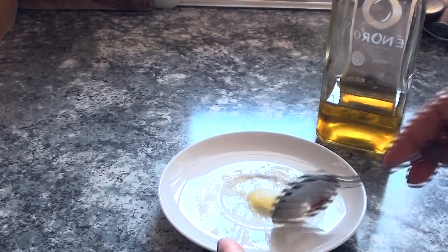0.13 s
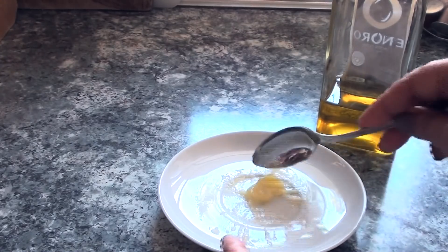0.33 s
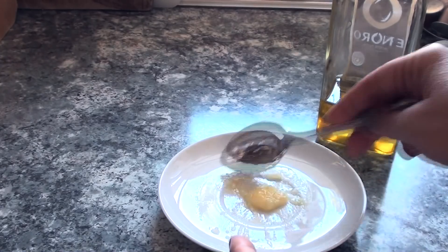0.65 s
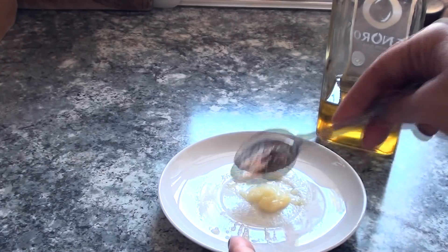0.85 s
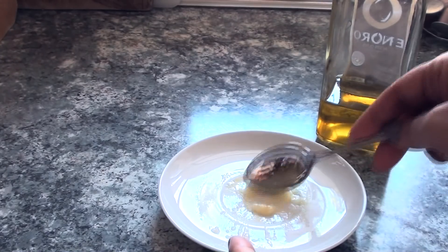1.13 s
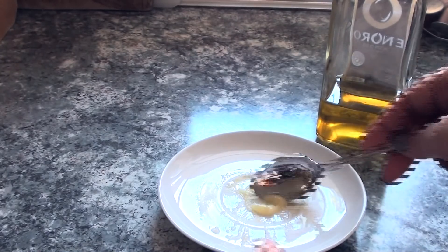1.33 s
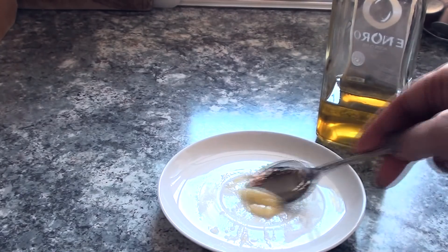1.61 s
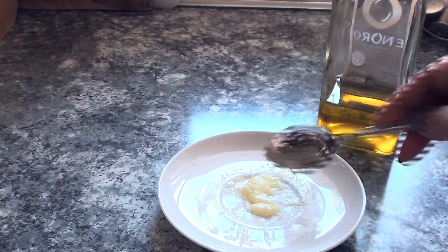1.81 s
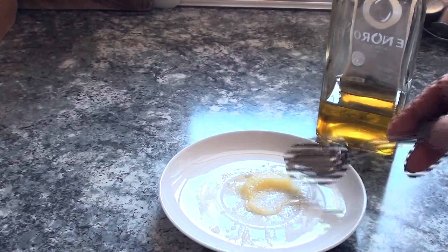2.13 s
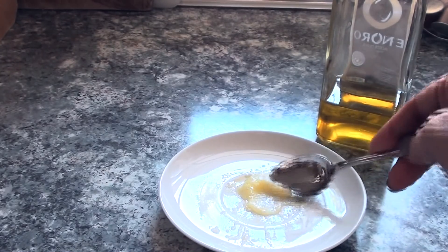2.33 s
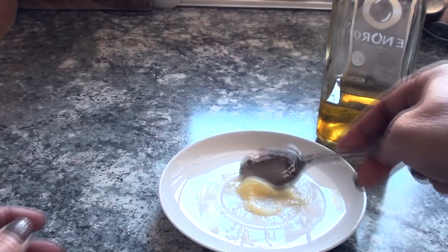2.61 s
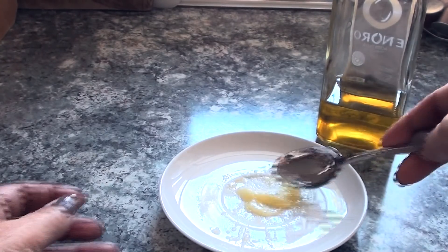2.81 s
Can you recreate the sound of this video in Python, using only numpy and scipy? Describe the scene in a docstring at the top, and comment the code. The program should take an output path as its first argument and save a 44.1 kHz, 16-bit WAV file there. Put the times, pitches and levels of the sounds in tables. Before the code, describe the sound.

Close stereo pickup of a spoon clinking and scraping a ceramic saucer on a stone counter; strokes grow lighter, nearly fade to wet smearing, then return brighter, over steady low hum and hiss with slight room echo.

```python
"""Spoon working paste on a saucer

A metal spoon works a paste round a small ceramic saucer on a stone counter, heard close to.
Strokes clink, chatter and scrape: impulses and grit noise drive damped saucer modes and thin spoon modes.
Faint short clinks of the spoon on the saucer are fast-decaying sines; lighter strokes only smear the
paste, as gliding bands of noise.
A hard kitchen echoes it by a decaying noise tail, over coloured noise as low appliance rumble and hiss."""
import sys
import numpy as np
from scipy import signal
from scipy.fft import rfft, irfft
from scipy.io import wavfile
from scipy.ndimage import uniform_filter1d

SR = 44100
rng = np.random.default_rng(int(sys.argv[2]) if len(sys.argv) > 2 else 0)


def invert_db(level):
    """Linear amplitude ratio for a level in decibels (20 dB per decade), elementwise."""
    return 10 ** (np.asarray(level, dtype=float) / 20)


def int16_out(signal):
    """Quantize to a 16-bit WAV file."""
    q = np.round(np.clip(np.atleast_2d(signal).T, -1, 1) * 32767)
    wavfile.write(sys.argv[1], SR, q.astype(np.int16))


N = 130095
TIME_S = np.arange(N) / SR


def unit(x):
    """Scale to rms 1."""
    return x / np.sqrt(np.mean(x ** 2))


def butter(x, order, hz, kind="low"):
    """Causal Butterworth filter."""
    return signal.sosfilt(signal.butter(order, hz, kind, fs=SR, output="sos"), x)


def colour(x, points):
    """Minimum-phase filter through (f/Hz, level/dB) points, by folding the cepstrum."""
    hz, db = np.array(points, float).T
    f = np.maximum(np.fft.rfftfreq(4096, 1 / SR), 1)
    log_gain = np.interp(np.log(f), np.log(hz), db) * np.log(10) / 20
    cepstrum = irfft(log_gain)
    cepstrum[1:2048] *= 2
    cepstrum[2049:] = 0
    impulse = irfft(np.exp(rfft(cepstrum)))
    return signal.fftconvolve(x, impulse)[:len(x)]


def walk(rate_hz):
    """Slow random wander of rms 1: noise averaged twice."""
    k = int(SR / rate_hz)
    return unit(uniform_filter1d(uniform_filter1d(rng.standard_normal(N), k), k))


def gate(t0, t1, edge_s):
    """Soft-edged stretch of contact; one that starts at 0 is already under way."""
    lift_s = max(edge_s, 0.04)
    rise = np.clip((TIME_S - t0) / edge_s + (t0 <= 0), 0, 1)
    fall = np.clip((t1 - TIME_S) / lift_s + 0.5, 0, 1)
    return rise * fall


def grit():
    """Dense uneven micro-impacts of metal on glaze, juddering in strength."""
    impacts_per_s, spread_db, judder_db = 9000, 2.5, 2.3
    size = invert_db(spread_db * np.minimum(rng.exponential(size=N), 3))
    hits = (rng.random(N) < impacts_per_s / SR) * rng.standard_normal(N) * size
    return unit(hits * invert_db(judder_db * walk(150)))


# scrapes over the glaze: start t/s, end t/s, treble level/dB, low level/dB, favoured low f/Hz
SCRAPE_STROKES = [(0, 0.058, -35.5, -37, 1400), (0.207, 0.309, -17, -28.5, 1450),
                  (0.446, 0.473, -50, -22.5, 624), (0.482, 0.56, -29, -28.5, 670),
                  (0.729, 0.812, -17, -23.5, 636), (0.809, 0.851, -58, -27, 1020),
                  (0.84, 0.917, -34, -39, 1120), (1.058, 1.115, -41, -38, 870),
                  (1.322, 1.435, -45, -45, 770), (1.587, 1.685, -39, -38.5, 780),
                  (2.313, 2.409, -43, -33.5, 765), (2.634, 2.686, -28, -29, 810),
                  (2.673, 2.75, -36, -35, 900)]


def scrapes():
    """Fading grit noise pushes the high, low and spoon modes; also gives the favoured high and low f/Hz."""
    edge_s, fade_db_per_s, spoon_db = 0.017, 38, -18
    push, favour_hz = np.zeros((3, N)), np.full((2, N), 5800.)
    rub = unit(butter(grit(), 2, 8500))
    for t0, t1, high_db, low_db, low_hz in SCRAPE_STROKES:
        fade = invert_db(-fade_db_per_s * np.clip(TIME_S - t0, 0, 1))
        stroke = rub * gate(t0, t1, edge_s) * fade
        push += stroke * invert_db([[high_db], [low_db], [high_db + spoon_db]])
        favour_hz[1, stroke != 0] = low_hz
    return push, favour_hz


def ring(push, modes, drift, favour_hz, slope_db_per_oct, partner=1):
    """Decaying modes that drift as the spoon presses; each contact spot favours those near its own pitch."""
    spot_db = 1.5
    spot = np.searchsorted(np.array(CLINK_BLOWS)[:, 0], TIME_S)  # a new spot at each clink
    chance = rng.standard_normal((len(CLINK_BLOWS) + 1, len(modes)))
    out = np.zeros(N)
    for k, (hz, db, t60_s) in enumerate(modes):
        pole = np.exp(-np.log(1000) / (t60_s * SR))
        carrier = np.exp(2j * np.pi * np.cumsum(hz * (1 + drift * walk(28))) / SR)
        octaves = np.log2(hz / favour_hz)
        # a favoured pitch also favours the one partner times higher
        distance = np.minimum(abs(octaves), abs(octaves - np.log2(partner)))
        share = invert_db(spot_db * chance[spot, k] - slope_db_per_oct * distance)
        envelope = signal.lfilter([np.sqrt(1 - pole ** 2)], [1, -pole], push * share / carrier)
        out += invert_db(db) * (envelope * carrier).imag
    return out


# damped low modes of the saucer: f/Hz, level/dB, t60/s
LOW_MODES = [(358, -9.5, .025), (604.5, -12, 0.079), (794, -2, 0.032), (1157, -10, 0.0073),
             (1807, 3, 0.017), (2230, 2.5, 0.012)]
# damped high modes of the saucer: f/Hz, level/dB, t60/s
HIGH_MODES = [(4255, -5, 0.012), (5363, -8, 0.029), (5800, -3.5, 0.014), (6410, -4, 0.0038),
              (7880, -7, 0.012), (8393, -14.5, 0.031), (9870, -11, 0.024)]


def saucer(high, low, favour_hz):
    """Damped ceramic modes clack; the low ones drift twice as far."""
    high_hz, low_hz = favour_hz
    clack = ring(high, HIGH_MODES, 0.012, high_hz, 51, partner=1.48)
    return clack + ring(low, LOW_MODES, 0.024, low_hz, 13.5)


# ringing modes of the spoon: f/Hz, level/dB, t60/s
SPOON_MODES = [(3590, 0, .05), (7197, 0, .1), (9242, -9, .08)]


def spoon(push):
    """Thin metal modes ring longer, with little drift and no favoured pitch."""
    return ring(push, SPOON_MODES, 0.005, 1, 0)


# broad rasp of the contact: f/Hz, level/dB
RASP_COLOUR = [(300, -27), (1200, -8), (2800, -22), (4000, -19), (6000, -20), (8500, -29), (16000, -65)]


def rasp(high):
    """The contact itself sounds broadly, as the high push through a fixed colour."""
    return colour(high, RASP_COLOUR)


def grind(low):
    """The saucer grinds on the stone: the low push in one broad band."""
    return invert_db(-10) * butter(low, 2, [1350, 3570], "band")


def saucer_and_spoon():
    """Every contact rings both bodies and rasps; such small things radiate no bass."""
    push, favour_hz = scrapes()
    add_clinks(push, favour_hz)
    high, low, metal = push
    out = saucer(high, low, favour_hz) + spoon(metal) + rasp(high) + grind(low)
    return butter(out, 4, 300, "high")


# rumble and hiss: f/Hz, level/dB
HUM_COLOUR = [(15, -93), (25, -22.5), (182, 3), (952, -12.5), (1980, -18.5), (3910, -22.5), (5570, -18),
              (14800, -30), (16500, -27)]
# side against mid: f/Hz, level/dB
HUM_SIDE_COLOUR = [(100, -31), (2500, -3), (14000, -21)]


def hum():
    """Steady appliance rumble and hiss: coloured noise, alike left and right in the bass, wider near 2.5 kHz."""
    level_db, wander_db = -44.5, 0.5
    mid = colour(rng.standard_normal(N), HUM_COLOUR)
    side = colour(colour(rng.standard_normal(N), HUM_COLOUR), HUM_SIDE_COLOUR)
    gain = invert_db(level_db + wander_db * walk(1.4)) / np.std(mid)
    return gain * (mid + side * np.array([[1], [-1]]))


def counter_bounce(near):
    """A late, band-limited bounce off the counter, opposite in sign left and right."""
    delay, centre_hz, level_db = 40, 3040, -18  # delay in samples
    late = np.r_[np.zeros(delay), near[:-delay]]
    side = invert_db(level_db) * butter(late, 2, [centre_hz / 4, centre_hz * 3], "band")
    return side * np.array([[1], [-1]])


# decay of the kitchen: f/Hz, t60/s
KITCHEN_DECAY = [(500, 0.78), (5000, .5), (12000, 0.16)]


def kitchen(x):
    """Hard walls: a noise tail with its own decay in each half octave, partly alike left and right."""
    gap_s, level_db, alike = 0.006, -10, 0.93
    t = np.arange(int(0.7 * SR)) / SR
    hz, t60_s = np.array(KITCHEN_DECAY).T
    tail = np.zeros((2, len(t)))
    for f in 250 * 2 ** np.arange(0, 6.1, 0.5):
        decay_s = np.interp(np.log(f), np.log(hz), t60_s)
        band = butter(rng.standard_normal((2, len(t))), 2, [f / 2 ** 0.25, f * 2 ** 0.25], "band")
        tail += band * invert_db(-60 * t / decay_s) / np.sqrt(decay_s)
    tail *= np.clip(t / gap_s - 1, 0, 1)  # silent for one gap, then rises over another
    mid, side = np.sqrt((1 + alike) / 2) * tail[0], np.sqrt((1 - alike) / 2) * tail[1]
    tail = mid + side * np.array([[1], [-1]])
    tail *= invert_db(level_db) / np.sqrt(np.sum(tail[0] ** 2))
    return signal.fftconvolve(x[None], tail, axes=1)[:, :N]


# clinks: t/s, level/dB, low knock re level/dB, spoon ring re level/dB, favoured treble f/Hz
CLINK_BLOWS = [(0.205, -3.5, -17, -4, 5540), (.209, -9, -4.5, -11, 5800), (0.4381, -5, -9, -19, 5830),
               (0.4417, -7, 5.5, -11, 5560), (0.4754, -9.5, -23, -20, 5250), (0.4801, -3.5, 1, -8, 5800),
               (0.7305, -7, -19, -3, 5920), (0.845, -9, -27, -27, 6400), (0.8497, -5.5, -25, -30, 5010),
               (1.0798, -10.5, -9, -43, 6030), (1.0839, -10, -39, -16, 5800), (1.3445, -17.5, -52, 2, 5700),
               (1.3516, -14.5, -2, -7.5, 5800), (1.3612, -19.5, 3, -22, 5460),
               (2.3017, -11.5, -16, -28, 5630), (2.305, -16.5, 14.5, -17, 5260),
               (2.3559, -13, -15, -6, 5800), (2.3634, -16, -41, -28, 5870), (2.378, -18, -27, -26, 5800),
               (2.6265, -5.5, -26, -10.5, 5370), (2.6497, -10.5, -29, -5, 5200),
               (2.6592, -16.5, -24, -7, 5000), (2.671, -10.5, -11, -10, 5650), (2.679, -18, -26, -10, 5450)]


def add_clinks(push, favour_hz):
    """Each blow is an impulse amid chattering grit, with a rounded low knock and a spoon impulse."""
    blow_db, chatter_db, chatter_s = 12, -12.5, 0.0025  # a blow pushes the slow modes all at once
    u = TIME_S[:260]
    for s, db, low_db, ring_db, hz in CLINK_BLOWS:
        i = int(s * SR)
        hit = i + 20
        burst = invert_db(chatter_db) * rng.standard_normal(len(u)) * np.exp(-(u / chatter_s) ** 2)
        burst[20] += 1
        push[0, i:i + len(u)] += burst * invert_db(db + blow_db)
        push[1, hit:hit + 20] += invert_db(db + blow_db + low_db) * np.hanning(20) / 10
        push[2, hit] += invert_db(db + blow_db + ring_db)
        favour_hz[:, i:i + len(u)] = [[hz], [1250]]


# faint short clinks: t/s, level/dB, f/Hz
FAINT_CLINKS = [(1.6078, -18.5, 4500), (1.631, -18, 2370), (1.716, -20.5, 7540), (2.127, -27, 4600),
                (2.338, -12, 7900), (2.432, -18, 7900)]


def faint_clinks():
    """Faint short clinks of the spoon on the saucer, as fast-decaying sines."""
    decay_s = 0.00014
    out, u = np.zeros(N), TIME_S[:300]
    for s, db, hz in FAINT_CLINKS:
        i = int(s * SR)
        out[i:i + 300] += invert_db(db) * np.sin(2 * np.pi * hz * u) * np.exp(-u / decay_s)
    return out


def noise_band(phase, width_hz):
    """Noise of fixed width about a gliding centre, from two low-passed noises in quadrature."""
    a, b = (unit(butter(rng.standard_normal(N), 2, width_hz / 2)) for _ in range(2))
    return a * np.cos(phase) + b * np.sin(phase)


# soft smears through the paste: start t/s, end t/s, level/dB, hollow from f/Hz, hollow to f/Hz
PASTE_SMEARS = [(1.7, 1.77, -56, 7000, 6900), (1.84, 1.92, -53.5, 3350, 3470),
                (1.967, 2.116, -45.5, 4900, 5875), (2.418, 2.62, -56.5, 6800, 6460)]


def smears():
    """Paste hisses through the hollow under the spoon's bowl, whose two resonances glide as it slides."""
    edge_s, width_hz, wander_db = 0.045, 1150, 3.6
    upper_ratio, upper_db, broad_db = 1.45, -7.5, -0.5
    out = np.zeros(N)
    for t0, t1, db, hz0, hz1 in PASTE_SMEARS:
        phase = 2 * np.pi * np.cumsum(np.interp(TIME_S, [t0, t1], [hz0, hz1])) / SR
        hiss = noise_band(phase, width_hz) + invert_db(upper_db) * noise_band(upper_ratio * phase, width_hz)
        broad = unit(butter(rng.standard_normal(N), 4, [4500, 10000], "band"))
        level = invert_db(db + wander_db * walk(55)) * gate(t0, t1, edge_s)
        out += level * (hiss + invert_db(broad_db) * broad)
    return out


def scene():
    """The saucer sits near the middle, with the counter's bounce, the kitchen's echo and the hum."""
    near = saucer_and_spoon() + faint_clinks() + smears()
    return near + counter_bounce(near) + kitchen(near) + hum()


def roll_off(x):
    """The treble ends steeply here."""
    return signal.sosfilt(signal.butter(12, 16730, fs=SR, output="sos"), x)


def record(dry):
    """A steep elliptic low-pass at 16 kHz cuts the top."""
    mix = signal.sosfilt(signal.ellip(8, 0.2, 70, 16000, fs=SR, output="sos"), dry)
    return roll_off(mix)


dry = scene()
out = record(dry)
int16_out(out)
```